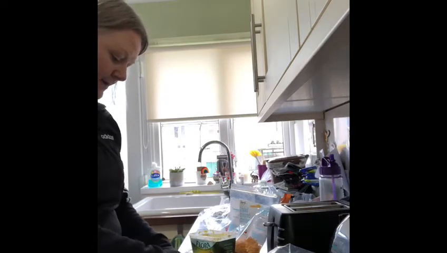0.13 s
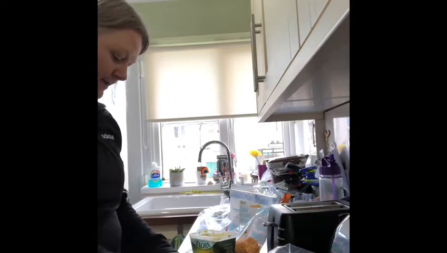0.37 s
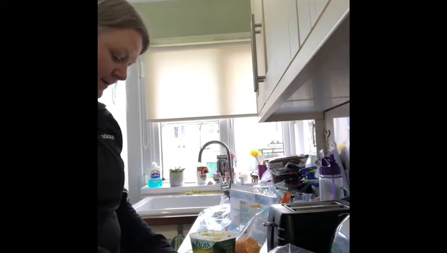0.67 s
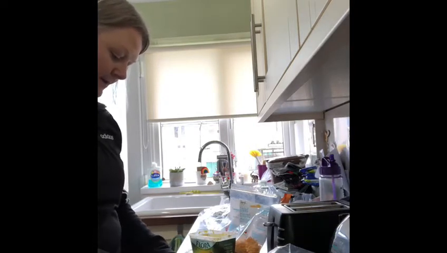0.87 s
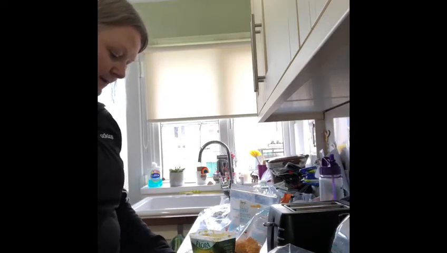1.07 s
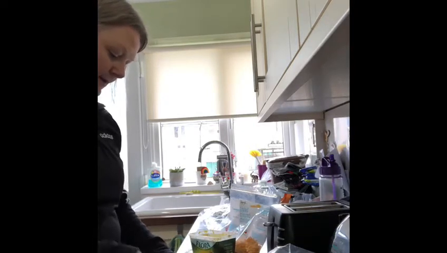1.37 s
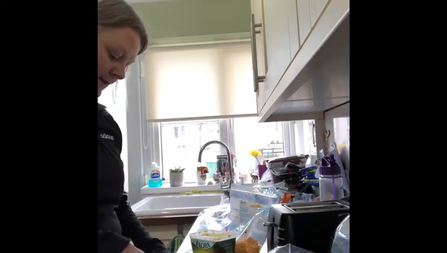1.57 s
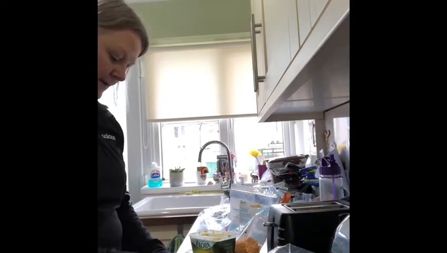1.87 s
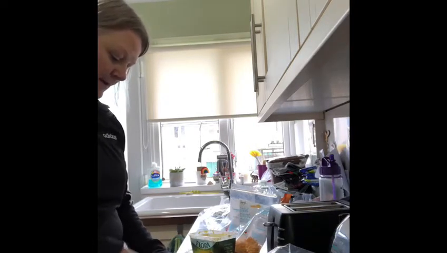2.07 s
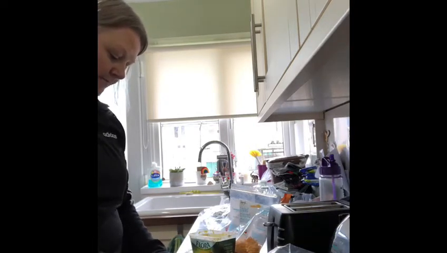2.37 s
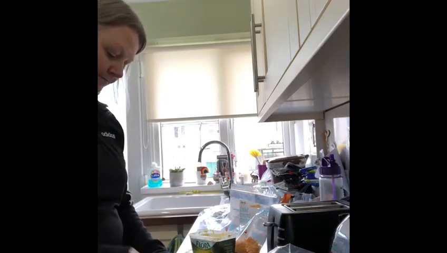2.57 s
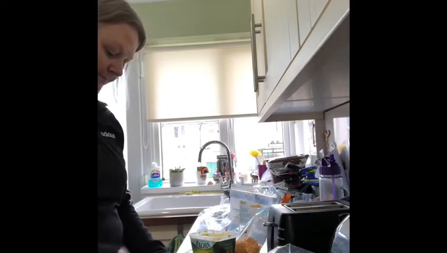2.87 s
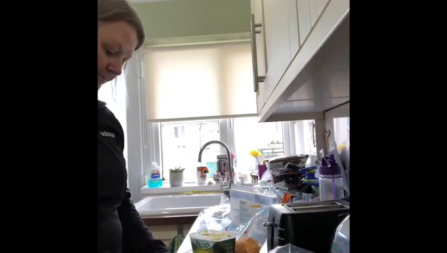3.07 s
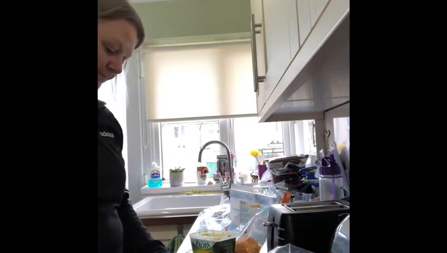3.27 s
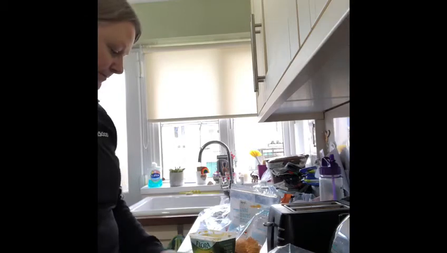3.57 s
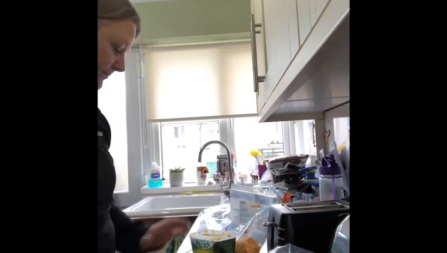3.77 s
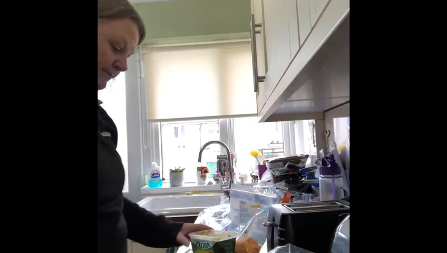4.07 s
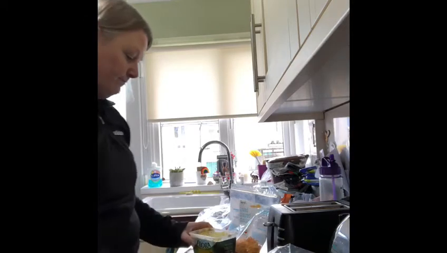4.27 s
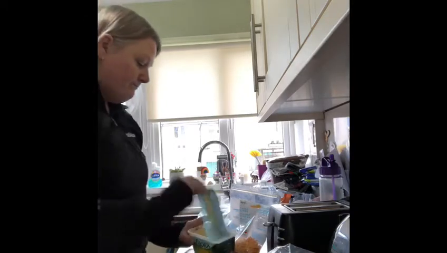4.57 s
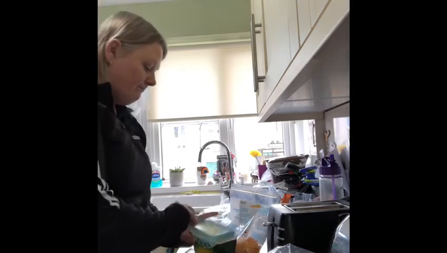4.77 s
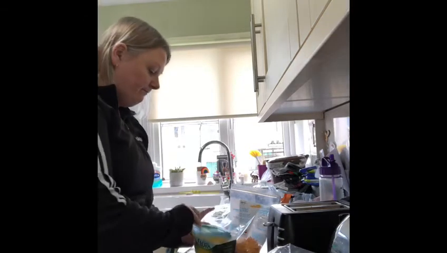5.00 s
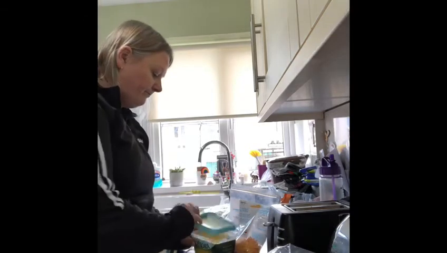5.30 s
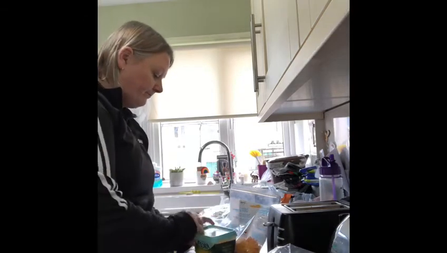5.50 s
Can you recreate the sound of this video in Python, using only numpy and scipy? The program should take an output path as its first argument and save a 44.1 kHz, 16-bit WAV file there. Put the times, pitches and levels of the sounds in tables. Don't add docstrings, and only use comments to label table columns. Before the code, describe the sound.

Crisp, irregular scraping on toast, two china taps and a ringing knife drop, followed by a sliding plastic tub and its creaking, snapping lid.

```python
import sys
import numpy as np
from scipy import signal
from scipy.fft import rfft, irfft
from scipy.io import wavfile
from scipy.ndimage import uniform_filter1d

SR = 44100
rng = np.random.default_rng(int(sys.argv[2]) if len(sys.argv) > 2 else 0)


def file_out(sig):
    cols = np.atleast_2d(sig).T
    lim = np.clip(cols, -1, 1)
    pcm = np.round(lim * 32767).astype(np.int16)
    wavfile.write(sys.argv[1], SR, pcm)


def volts(x):
    e = np.asarray(x, float) / 20
    return 10 ** e


N = 248707
LN_60DB = np.log(1000)

# start_s, peak_db, pitch_hz
SNAPS = [(0.2108, -31, 2250), (0.217, -47, 2100), (0.2302, -24, 2760), (0.2598, -22.5, 2740),
         (0.28, -39, 1700), (0.5766, -46, 1930), (0.605, -31, 1980), (0.626, -28, 2050),
         (0.643, -25.5, 1680), (0.68, -36, 1680), (0.9537, -28, 1930), (1.0782, -28.5, 2130),
         (1.119, -34, 2130), (1.334, -39, 3320), (1.361, -42, 930), (1.573, -29.5, 2340),
         (1.8205, -27.5, 1680), (2.2112, -56, 2050), (2.2524, -39, 1250), (2.6089, -48, 1970), ]
# freq_hz, level_db (per Hz)
CRUST = [(470, -29.5), (800, 4), (965, -1), (1490, 4), (1600, -4), (1740, 2), (1920, 6.5), (4200, -6.5),
         (5460, -19), (9240, -120)]
# freq_hz, level_db (per Hz)
BLADE = [(1880, -14.5), (3200, 0), (4270, -6.5), (4860, -2), (6230, -6), (8270, -9), (10200, -18),
         (11400, -13.5), (12200, -34), (12800, -62), (16600, -103), (22000, -120)]
# freq_hz, width_hz, level_db
SCRAPE_RINGS = [(1500, 43, -11), (1700, 32, 22.5), (2077, 40, -17), (2478, 68, -2), (4880, 46, -1),
                (5450, 68, -10), (5680, 97, -6), (7000, 46, -9), (7600, 40, 1), (8530, 90, -2),
                (9400, 32, -11), (11040, 77, 10), (11500, 33, -5)]
# time_s, edge_hiss_db (re crackle)
EDGE = [(0.0, -6.5), (0.22, -35), (0.3, -16), (0.42, -8), (0.585, -28), (0.62, -6), (0.655, -32),
        (0.69, -9), (0.78, -16), (0.95, -14), (1.1, -11), (1.3, -39), (1.47, -10.5), (1.6, -10),
        (1.83, -24), (2.0, -8), (2.26, -12.5), (2.4, -12)]


def toast():
    crackle, hiss, body = strokes()
    body = body + volts(-7) * leans() * (crackle > 0)
    drag = flutter(60, 1.7) * flutter(21, 3.1)
    coarse, fine = grains(1500, 2.8), grains(7000, 3.2)
    out = crackle * colour(drag * coarse, CRUST, SCRAPE_RINGS, ring_db=-0.5)

    steel_drag = np.sqrt(drag * drag[::-1])
    out += hiss * colour(steel_drag * (fine + 0.49 * coarse), BLADE, SCRAPE_RINGS, ring_db=-3.5)

    edge = volts(np.interp(np.arange(N) / SR, *np.transpose(EDGE))) * flutter(34.3, 2.1)
    edge_colour = [(4000, -38), (6000, -2), (8600, -6.5), (11200, -2), (12400, -16), (16000, -64)]
    out += crackle * edge * colour(grains(5500, 2.2), edge_colour, SCRAPE_RINGS, ring_db=5.0)

    body_colour = [(200, -32.5), (320, 6), (600, 10.0), (950, 15.0), (1200, -21)]
    out += body * colour(drag * coarse, body_colour)

    for s, db, hz in SNAPS:
        snap = cluster(hz, 0.025, 0.33, 0.03)
        splinter = cluster(3.0 * hz, 0.0016, 0.27, 0.03)
        add(out, s, volts(db - 10.5) * (snap + 0.5 * splinter))
    return out


# start_s, bite_s, drag_s, bite_db, lift_db (crackle levels)
STROKES = [(0.0, 0.00063, 0.0061, -42, -49), (0.209, 0.053, 0.12, -41, -48),
           (0.576, 0.0034, 0.016, -48, -58), (0.597, 0.038, 0.032, -39.5, -45.5),
           (0.677, 0.0026, 0.073, -43, -52), (0.763, 0.003, 0.014, -52, -70),
           (0.829, 0.0015, 0.011, -53, -69.5), (0.937, 0.012, 0.054, -53, -57.5),
           (0.993, 0.0057, 0.1, -48, -52), (1.25, 0.028, 0.11, -69.5, -68.5),
           (1.393, 0.0043, 0.092, -69, -72), (1.445, 0.027, 0.12, -47, -47),
           (1.816, 0.025, 0.033, -40.5, -54), (1.867, 0.0073, 0.17, -54.5, -58),
           (2.204, 0.0049, 0.075, -63.5, -92), (2.246, 0.0069, 0.17, -44.5, -62),
           (2.606, 0.0033, 0.023, -52.5, -67), (2.635, 0.012, 0.11, -63, -66),
           (3.036, 0.0038, 0.01, -52, -60), (3.12, 0.044, 0.0035, -61.5, -64)]


def strokes():
    bite_db_per_s, lift_db_per_s, landing_db, gone_db = 158, 386, -6, 40
    hiss_db = (-4, -7.5, 0.5, 0.5)
    body_db = np.array((-18.5, -19, -12.5, -12.5))
    light_body = 0.59
    tables, firmest = [], max(row[3] for row in STROKES)
    for s, bite, drag, bite_db, lift_db in STROKES:
        times = s + np.cumsum([0, bite, drag, gone_db / lift_db_per_s])
        start_db = bite_db + landing_db - bite_db_per_s * bite
        crackle = start_db, bite_db, lift_db, lift_db - gone_db
        body = body_db + light_body * (firmest - bite_db)
        tables.append(np.transpose([times, crackle, hiss_db, body]))
    return gains(tables)


# freq_hz, level_db (per Hz)
PLATE = [(150, -20.5), (250, -14), (420, -7.5), (948, -3.5), (2720, -10), (3100, -1.5), (6090, -16),
         (6610, -13.5), (7420, -11.5), (11800, -22), (12800, -48), (16600, -90.5), (22000, -120)]


def knife(blows, rings, crack_t60, split, crack_db, thud_db, wet_db):
    out, plate = np.zeros(N), colour(rng.standard_normal(N), PLATE)
    length = 0.4
    t = seconds(length)
    rocking = flutter(200, 5.5)
    touch = 1 - np.exp(-t / 0.0007)
    soft = 1 - np.exp(-t / 0.0067)

    def rock():
        return rocking[rng.integers(N - len(t)):][:len(t)]

    for s, db in blows:
        steel = 0
        for hz, ring_db, t60 in rings:
            detuned = hz * (1 + 0.0018 * rng.standard_normal())
            mode = ring(detuned, 0.62 * t60, length) * rock()
            mode += 0.58 * ring(hz * (1 + split), 0.56 * t60, length) * rock()
            mode += 1.9 * ring(hz * (1 - 1.3 * split), 0.19 * t60, length)
            steel = steel + volts(ring_db + 2.2 * rng.standard_normal()) * mode
        crack = plate[int(s * SR):][:len(t)] * decay(t, crack_t60)
        thud = ring(115.6, 0.12, length) + 0.69 * ring(180, 0.12, length) + 0.05 * ring(54, 0.19, length)
        strike = touch * (level(steel, -24.0) + volts(crack_db) * crack)
        add(out, s, volts(db) * (strike + volts(thud_db) * soft * thud))
    return room(out, wet_db)


# start_s, peak_db
FIRST_TAP = [(2.782, -29), (2.785, -27), (2.788, -33.5), (2.792, -31.5), (2.798, -38), (2.806, -36)]
# freq_hz, level_db, t60_s
FIRST_RINGS = [(840, 3, 0.081), (1655, 4.5, 0.064), (2460, -14, 0.076), (2875, 3, .075), (3148, -1, 0.15),
               (3410, -5, 0.11), (3978, -7, 0.11), (4490, -7, 0.076), (5890, -0.5, 0.1), (6030, -15, 0.11),
               (6280, -3.5, 0.076), (7180, -8, .05), (8470, -24, 0.064), (9300, -8, 0.044)]


def first_tap():
    return knife(FIRST_TAP, FIRST_RINGS, 0.027, 0.011, crack_db=-12.5, thud_db=-28, wet_db=-8.5)


# start_s, peak_db
SECOND_TAP = [(3.181, -24), (3.184, -30), (3.188, -33)]
# freq_hz, level_db, t60_s
SECOND_RINGS = [(740, 4.5, 0.034), (1150, -16, 0.089), (1903, -6, .07), (2780, -16.5, 0.049),
                (3185, -4, 0.079), (3330, 4.5, .045), (4380, -7, 0.062), (4800, -13.5, .03),
                (6005, 0, 0.055), (7400, -5.5, 0.058), (7800, -5, 0.04), (8690, -21.5, .066),
                (9500, -6.5, 0.076), (11100, -10, .089)]


def second_tap():
    return knife(SECOND_TAP, SECOND_RINGS, 0.029, 0.016, crack_db=-6.0, thud_db=-22.5, wet_db=-5.5)


# start_s, peak_db
DROP = [(3.537, -39.5), (3.542, -36.5), (3.548, -12.5), (3.552, -13.5), (3.557, -23), (3.565, -10.5),
        (3.569, -17), (3.573, -19.5), (3.578, -20.5), (3.584, -24.5), (3.589, -26), (3.595, -32)]
# freq_hz, level_db, t60_s
DROP_RINGS = [(418, -6.5, 0.088), (942, -10, 0.24), (948, 1, 0.028), (1477, -8, .06), (1860, -11.5, 0.031),
              (2053, -8, 0.067), (2377, 3.5, .045), (3153, 2, 0.061), (3034, 2.5, 0.05), (3900, -9.5, .07),
              (3940, -1, 0.063), (4450, 1.5, 0.11), (6010, 1.5, 0.13), (7131, -8, 0.12), (7620, -7.5, 0.19),
              (8580, -8, 0.062), (9410, -2.5, 0.089), (11350, -17, 0.063), (11410, -10, 0.11)]


def knife_drop():
    return knife(DROP, DROP_RINGS, 0.03, 0.0096, crack_db=-7.0, thud_db=-23.0, wet_db=-8.0)


# start_s, click_db (peak), click_hz, body_db (hollow knock), body_hz
GRIP = [(4.0145, -41, 6700, -57, 2250), (4.024, -42, 6680, -48, 1100), (4.033, -30.5, 7000, -20, 1350),
        (4.0441, -29.5, 7500, -44, 2090), (4.0762, -33, 6050, -40, 1300), (4.091, -34, 6400, -47, 2210),
        (4.1037, -26, 6800, -17, 1280), (4.1204, -31.5, 4580, -33, 1300)]
# start_s, click_db (peak), click_hz, body_db (hollow knock), body_hz
LID = [(4.5243, -18.5, 3740, -30, 1750), (4.5412, -12.5, 4870, -31, 1860), (4.549, -22, 4500, -31, 520),
       (4.6136, -39, 4480, -35, 990), (4.65, -38, 3270, -55, 1000), (4.6625, -34, 4600, -36, 1010),
       (4.7132, -26.5, 4950, -35, 1000), (4.7383, -32.5, 5700, -31, 970), (4.8336, -51, 4350, -36.5, 1060),
       (4.852, -32.5, 7100, -55, 1000), (4.871, -32.5, 3800, -36, 830), (4.9558, -27, 7100, -39, 1240),
       (5.003, -32, 5270, -32.5, 870), (5.0208, -26, 6640, -37, 815), (5.0396, -27.5, 4600, -37.5, 900),
       (5.1896, -64, 4670, -48, 1540), (5.2645, -50, 4640, -58, 1030), (5.3039, -44, 4700, -26.5, 880),
       (5.312, -53, 4700, -30, 1150), (5.3369, -24.5, 4720, -24, 814), (5.3544, -19.5, 4850, -37, 635),
       (5.3844, -50, 4700, -35, 750), (5.4858, -49, 4700, -32.5, 634), (5.5288, -53, 4680, -29.5, 696),
       (5.5523, -52, 4700, -36.5, 515), (5.6196, -58, 4730, -47, 1080)]
# start_s, swell_s, body_db, fade_db_per_s, rim_db (crackle re body)
CREAK = [(4.524, 0.0055, -37, 700, 5), (4.57, .08, -64.5, 200, 3), (4.663, 0.0031, -48, 88, -12),
         (4.7, 0.014, -54, 496, 8), (4.738, 0.0018, -41.5, 197, -7), (4.825, 0.0082, -44.5, 61.4, -8),
         (4.85, 0.011, -44, 260, -5.5), (4.9, 0.0069, -52, 150, -28), (4.93, 0.027, -51.5, 504, 1),
         (5.004, 0.0008, -41, 500, -1.5), (5.022, 0.0014, -45.5, 500, -6), (5.04, 0.00068, -48, 400, 1.5),
         (5.18, 0.0067, -63, 595, -6), (5.302, 0.01, -43.5, 99, -12.5), (5.328, 0.014, -34, 890, -12),
         (5.358, 0.0016, -36, 307, -11), (5.486, .003, -46, 700, -12.5), (5.53, 0.0022, -49, 350, -13.5),
         (5.59, 0.035, -62.5, 101.6, -5.5)]
# start_s, swell_s, wall_db, fade_db_per_s, nail_db (crackle re wall)
GRASP = [(4.015, 0.019, -42, 75, -6)]
# freq_hz, level_db (per Hz)
TUB = [(160, -39.5), (280, 1.5), (574, 0.5), (673, 2), (950, 5.5), (1500, -2.5), (1710, -2.5), (2600, -9.5),
       (3380, -62), (5720, -120)]
# freq_hz, width_hz, level_db
TUB_RINGS = [(505, 26, -3), (655, 32, 6), (954, 91, -13), (1697, 34, -3), (2203, 26, -21)]
# freq_hz, level_db (per Hz)
TUB_WALL = [(180, -31), (300, -13), (382, -9.5), (857, -4.5), (1050, -7), (1260, 7), (1620, -16),
            (2100, 5.5), (2430, -9), (3000, -35), (3900, -63), (6600, -120)]
# freq_hz, level_db (per Hz)
RIM = [(1180, -37), (2000, -25), (2840, 6.5), (3090, -2), (4180, 3), (4920, 2.5), (5150, 5), (11200, -12),
       (12100, -24), (12800, -42), (16600, -72), (22000, -120)]
# freq_hz, level_db (per Hz)
NAIL = [(1200, -30), (2500, 0), (4500, -8), (7000, -2), (9500, -3), (11500, -7), (12400, -30), (16600, -80)]
# start_s, pitch_hz, level_db, t60_s
CHIRPS = [
    (5.224, 4710, -58, .04),
    (5.272, 3530, -63, 0.047),
]


def tub():
    wall, nail = bursts(GRASP)
    body, rim = bursts(CREAK)
    slip = flutter(90, 0.53)
    coarse, fine = slip * grains(2500, 4.7), np.sqrt(slip) * grains(6000, 0.93)
    out = body * colour(coarse, TUB, TUB_RINGS, ring_db=4.5)
    out += wall * colour(coarse, TUB_WALL)
    out += rim * colour(fine, RIM)
    out += nail * colour(fine, NAIL)

    length = 0.04
    plastic, t = colour(rng.standard_normal(N), RIM), seconds(length)
    click_t60, knock_t60, loose = 0.009, 0.017, 0.3
    slow = 1 - np.exp(-t / 0.001)
    for s, click_db, click_hz, body_db, body_hz in GRIP + LID:
        tick = plastic[int(s * SR):][:len(t)]
        tick = tick * (decay(t, 0.02) * slow)[:len(tick)]
        add(out, s, volts(click_db - 8.0) * tick)
        add(out, s, volts(click_db) * slow * cluster(click_hz, click_t60, 0.092, length, count=8))
        knock = cluster(body_hz, knock_t60, loose, length, count=6)
        knock += 0.4 * cluster(1.9 * body_hz, knock_t60, loose, length)
        add(out, s, volts(body_db) * slow * knock)

    onset = np.minimum(seconds(0.1) / 0.0059, 1)
    for s, hz, db, t60 in CHIRPS:
        add(out, s, volts(db) * ring(hz, t60, 0.1) * onset)
    return signal.sosfilt(signal.butter(2, 300, "high", fs=SR, output="sos"), out)


def bursts(rows):
    swell_db, let_go_s = -32.5, 0.076
    t, out = np.arange(N) / SR, 0
    for s, swell, db, fade, rim_db in rows:
        late = np.maximum(t - s - swell, 0)
        shape_db = swell_db * np.clip(1 - (t - s) / swell, 0, 1)
        shape_db = shape_db - fade * late * (1 + late / let_go_s)
        gain = (t >= s) * volts(db + np.maximum(shape_db, -200))
        out = out + gain * np.array([[1], [volts(rim_db)]])
    return out


# time_s, hiss_db
SLIDE = [
    [(3.925, -62), (3.95, -56.5), (4.0, -68)],
    [(4.13, -64), (4.168, -49), (4.346, -43), (4.432, -54), (4.496, -68), (4.51, -75)],
]
# freq_hz, level_db (per Hz)
SLIDE_COLOUR = [(150, -81.5), (250, -29), (416, -1.5), (705, -12.5), (1190, -4.5), (1920, -14),
                (5340, -3.5), (9650, -16.5), (10400, -35), (11300, -24), (12800, -41), (16600, -53),
                (22000, -120)]
# freq_hz, width_hz, level_db
SLIDE_RINGS = [(520, 26, -12), (1176, 18, 14), (2270, 130, 13), (3400, 480, -4), (4660, 140, -25),
               (5440, 98, -19), (7600, 93, -22), (9630, 240, -2), (10600, 89, -28), (11600, 920, -23)]


def slide():
    hiss, = gains(SLIDE)
    rub = flutter(30.94, 0.66) * grains(12000, 1.8)
    return hiss * colour(rub, SLIDE_COLOUR, SLIDE_RINGS, ring_db=5.5)


# start_s, rumble_db, length_s
LEANS = [(-0.05, -60, 0.087), (0.202, -59.5, 0.24), (0.566, -53.5, 0.25), (0.915, -53, 0.23),
         (1.421, -61, 0.26), (1.8, -59.5, 0.28), (2.246, -54, 0.18), (2.598, -58, 0.11),
         (3.029, -50.5, 0.05), (3.996, -50, .12), (4.144, -68.5, 0.32), (4.516, -48, 0.049),
         (4.612, -56, 0.11), (4.73, -61, 0.089), (4.828, -59.5, 0.14), (5, -63, 0.12), (5.314, -50, 0.11),
         (5.476, -51, 0.055), (5.529, -63, .08)]


def leans():
    t, skew = np.arange(N) / SR, 1.05
    return sum(volts(db) * np.sin(np.pi * np.clip((t - s) / length, 0, 1) ** skew) for s, db, length in LEANS)


# freq_hz, level_db (per Hz)
COUNTER = [(21, -0.5), (35, -16), (55, -20.5), (85, -9.5), (134, 1), (214, 1), (274, -10), (330, -15),
           (430, -15.5), (730, -120)]


def rumble(gain):
    shaking = colour(rng.standard_normal(N), COUNTER)
    return uniform_filter1d(gain, size=500) * flutter(24.81, 1.16) * shaking


# start_s, peak_db, pitch_hz
THUMPS = [(0.33, -48, 55), (0.599, -49, 52), (0.96, -55, 60), (2.27, -46, 55), (2.619, -43.5, 56),
          (3.051, -43.5, 58), (3.554, -40.5, 62), (4.03, -46, 55), (5.35, -50, 60)]


def thumps():
    out, t = np.zeros(N), seconds(0.3)
    for s, db, hz in THUMPS:
        add(out, s, volts(db) * ring(hz, 0.22, 0.3) * (1 - np.exp(-t / 0.017)))
    return out


# freq_hz, level_db (per Hz)
KITCHEN = [(18, -32.5), (30, -9), (408, -9.5), (474, -9), (552, -9.5), (627, -13), (1340, -17.5),
           (1910, -19.5), (2660, -23), (3170, -22), (3420, -22.5), (11000, -32.5), (12800, -46.5),
           (16600, -87.5), (22000, -120)]


def kitchen():
    noise = rng.standard_normal(N)
    bass = signal.sosfilt(signal.butter(2, 300, fs=SR, output="sos"), noise)
    return level(colour(noise + (flutter(4, 3) - 1) * bass, KITCHEN), -67.5)


def room(x, wet_db):
    t = seconds(0.5)
    noise = rng.standard_normal(len(t)) * (1 - np.exp(-(t / 0.00047) ** 2))
    dull = signal.sosfilt(signal.butter(1, 2500, fs=SR, output="sos"), noise)
    tail = dull * decay(t, 0.36) + (noise - dull) * decay(t, 0.25)
    return x + volts(wet_db) * signal.fftconvolve(x, tail / np.sqrt(np.sum(tail ** 2)))[:N]


def seconds(length):
    return np.arange(int(length * SR)) / SR


def decay(t, t60):
    return np.exp(-LN_60DB * t / t60)


def ring(hz, t60, length):
    t = seconds(length)
    return rng.choice([-1, 1]) * np.sin(2 * np.pi * hz * t) * decay(t, t60)


def cluster(hz, t60, spread, length, count=4):
    off = rng.standard_normal(count) * np.arange(count) / count
    out = sum(ring(hz * (1 + spread * o), t60 / (1 + 2.8 * abs(o)), length) for o in off)
    return out / np.max(np.abs(out))


def grains(per_s, spread_db):
    chance = rng.random((3, N))
    size = np.minimum(-np.log(1 - chance[2]), 4)
    return (chance[0] < per_s / SR) * np.sign(chance[1] - 0.5) * volts(spread_db * size)


def flutter(rate, depth_db):
    hold = int(SR / rate)
    steps = np.repeat(rng.standard_normal(N // hold + 1), hold)
    return volts(depth_db * uniform_filter1d(steps, hold)[:N])


def gains(tables):
    t, out = np.arange(N) / SR, 0
    for rows in tables:
        s, first, *rest = np.transpose(rows)
        on = (t >= s[0]) & (t < s[-1])
        columns = [first] + [first + r for r in rest]
        out = out + np.array([on * volts(np.interp(t, s, c)) for c in columns])
    return uniform_filter1d(out, size=40, axis=1)


def level(x, db=0):
    return x * volts(db) / np.sqrt(np.mean(x ** 2))


def colour(x, points, rings=(), ring_db=0, size=4096):
    hz = np.maximum(np.arange(size // 2 + 1) * SR / size, 1)
    f, db = np.transpose(points)
    gain = volts(np.interp(np.log(hz), np.log(f), db))
    lift = 1 + sum(volts(ring_db + 0.29 * d) / (1 + (2 * (hz - c) / w) ** 2) for c, w, d in rings)
    cepstrum = irfft(np.log(gain * lift))
    cepstrum[1:size // 2] *= 2
    cepstrum[size // 2 + 1:] = 0
    return level(signal.fftconvolve(x, irfft(np.exp(rfft(cepstrum))))[:N])


def add(track, s, sound):
    i = int(s * SR)
    track[i:i + len(sound)] += sound[:N - i]


def scene():
    rubbing = room(toast() + slide() + rumble(leans()), wet_db=-8.5)
    plate = first_tap() + second_tap() + knife_drop()
    plastic = room(tub(), wet_db=-7.0)
    return (rubbing + plate + plastic + thumps() + kitchen())[None]


def band_limit(x):
    return signal.sosfilt(signal.butter(12, 12920, fs=SR, output="sos"), x)


def record(dry):
    mic = signal.sosfilt(signal.butter(4, 42, "high", fs=SR, output="sos"), dry)
    mic = signal.sosfilt(signal.ellip(10, 0.2, 70, 12150, fs=SR, output="sos"), mic)
    return band_limit(mic)


dry = scene()
out = record(dry)
file_out(out)
```